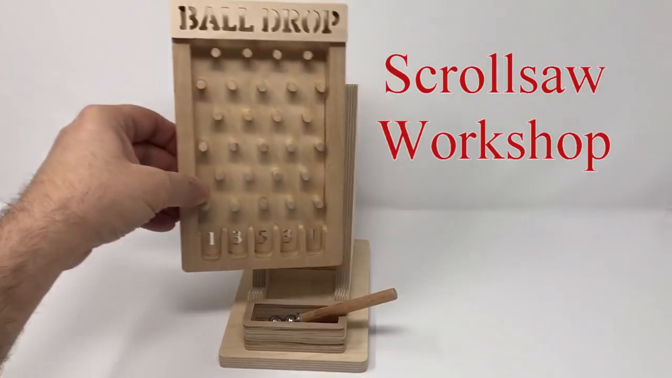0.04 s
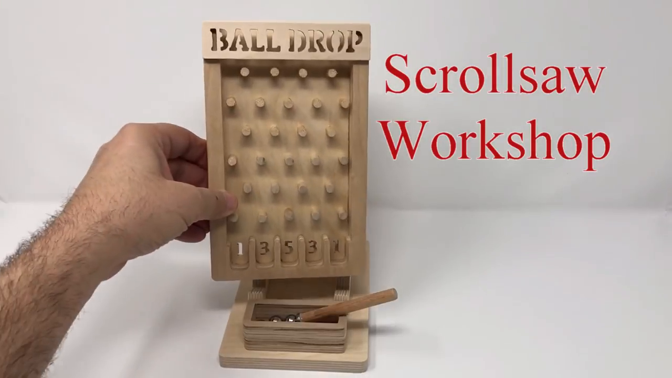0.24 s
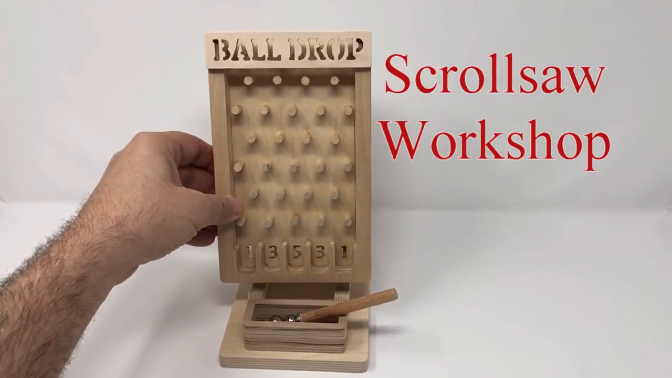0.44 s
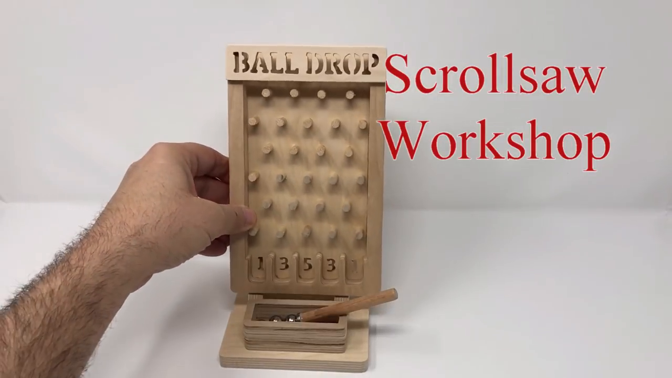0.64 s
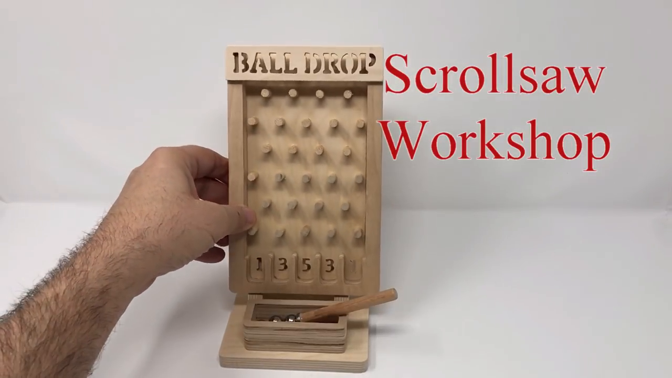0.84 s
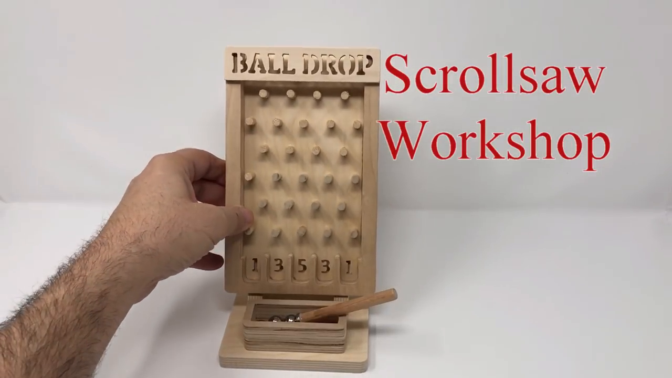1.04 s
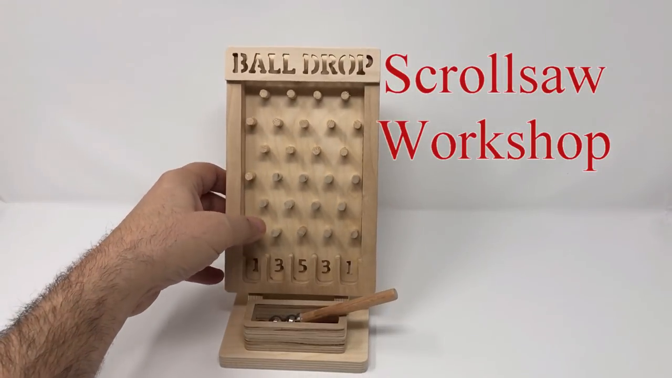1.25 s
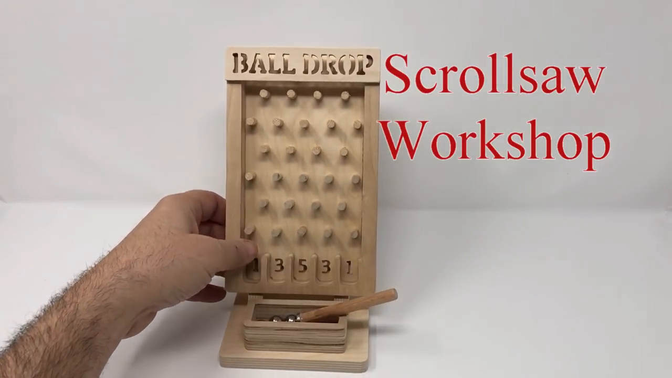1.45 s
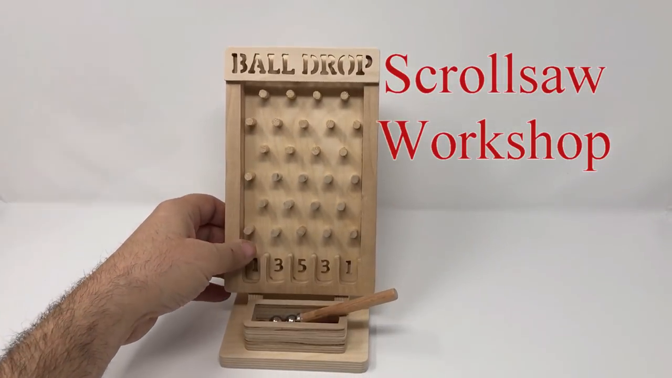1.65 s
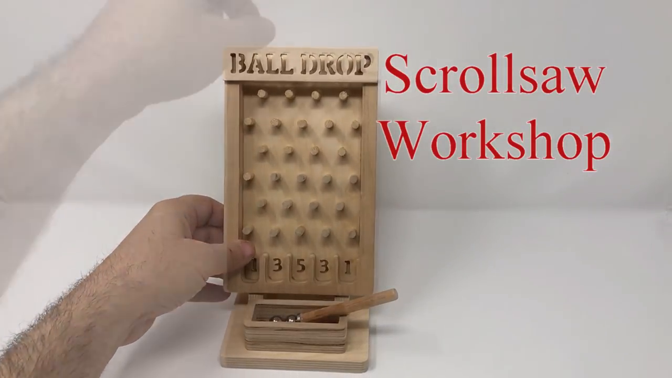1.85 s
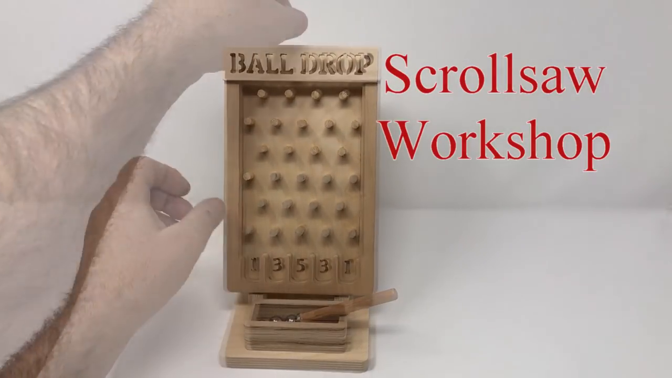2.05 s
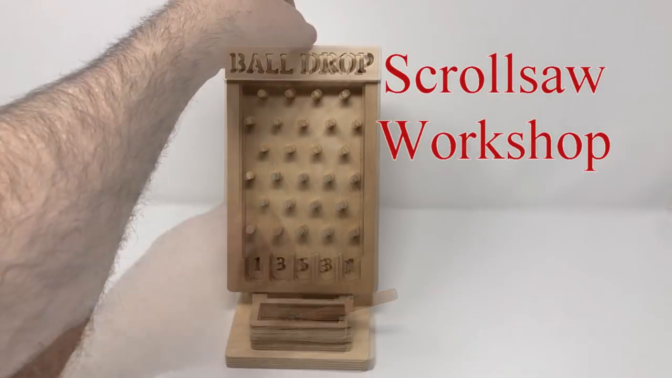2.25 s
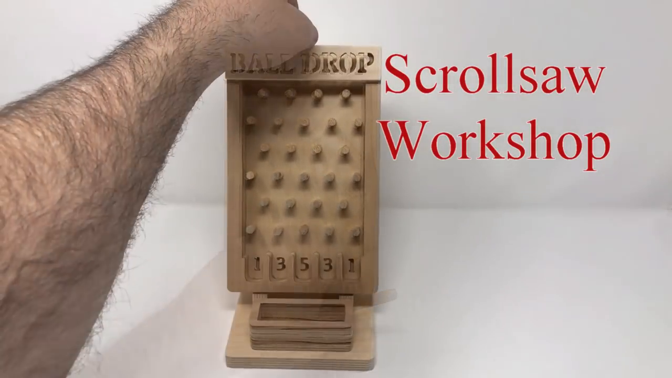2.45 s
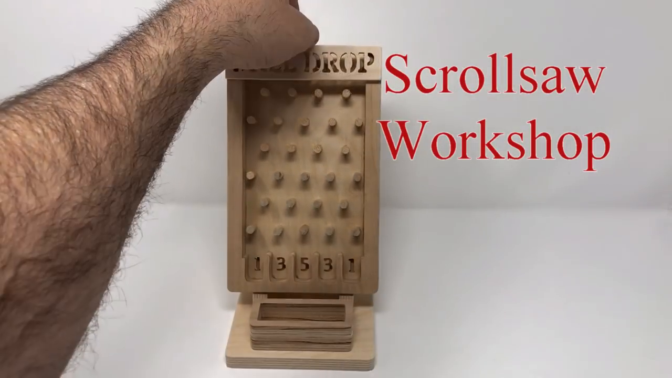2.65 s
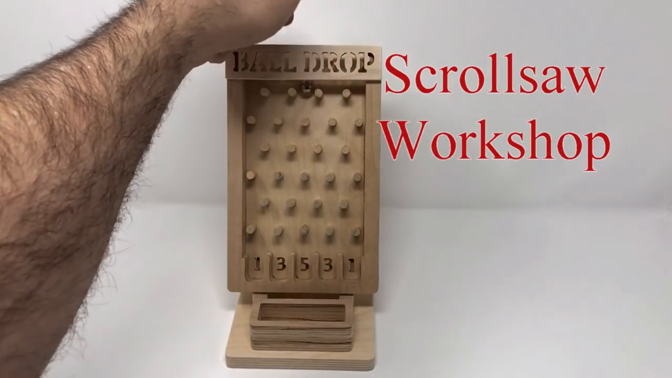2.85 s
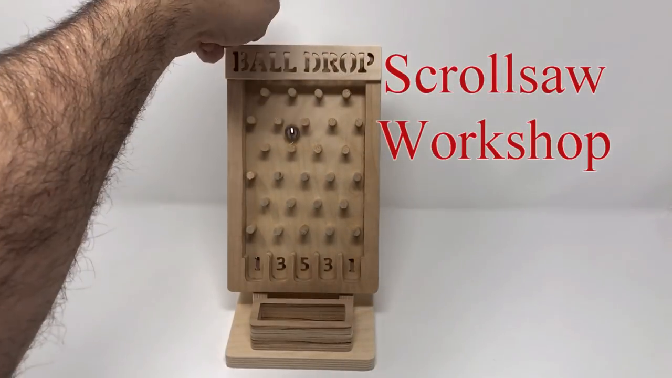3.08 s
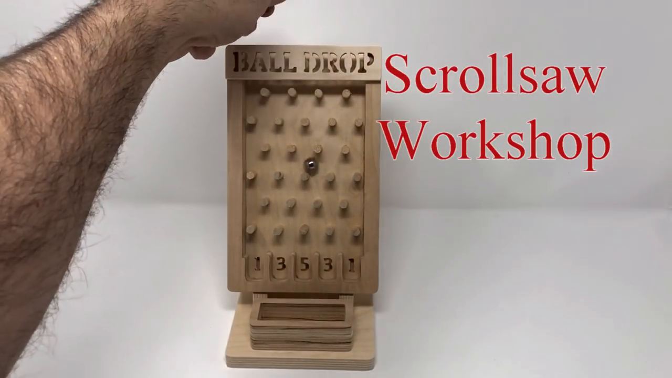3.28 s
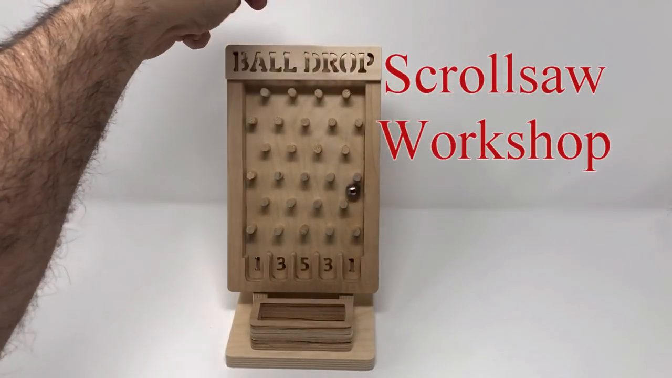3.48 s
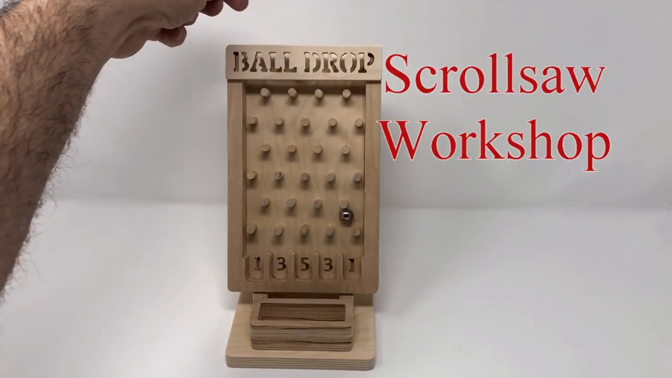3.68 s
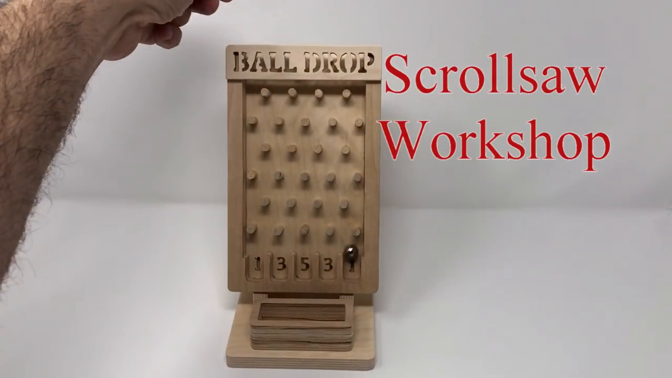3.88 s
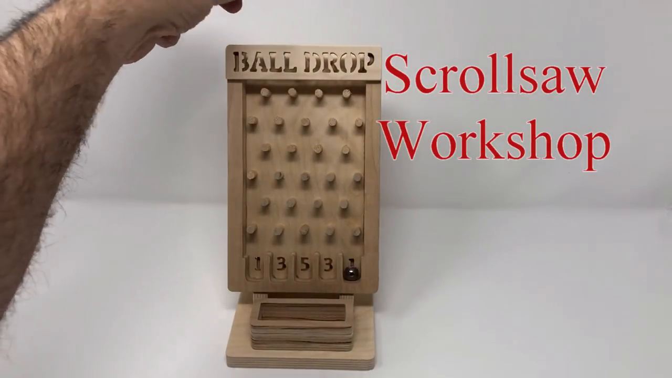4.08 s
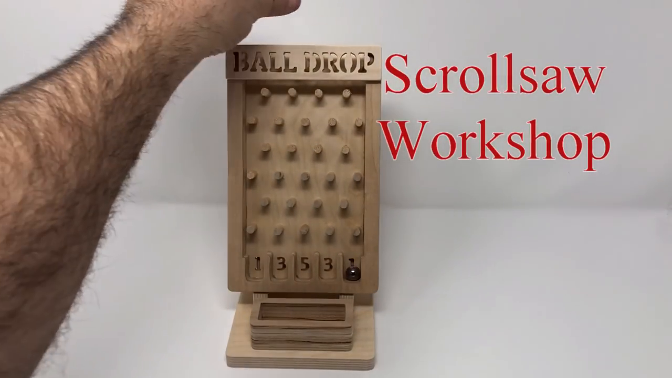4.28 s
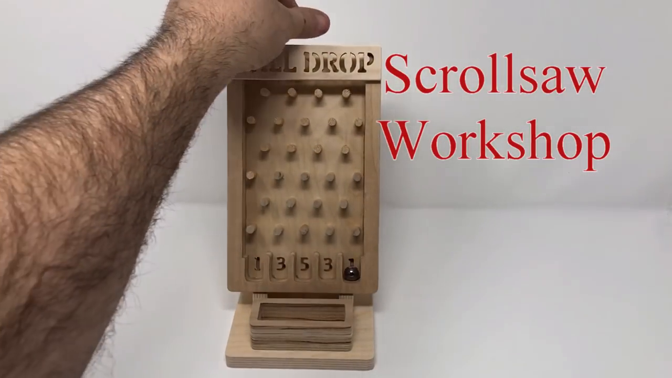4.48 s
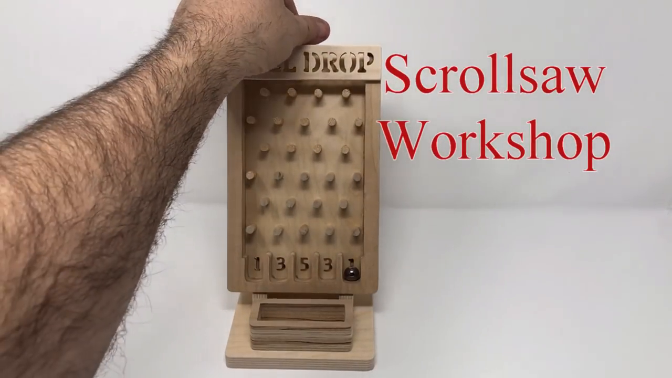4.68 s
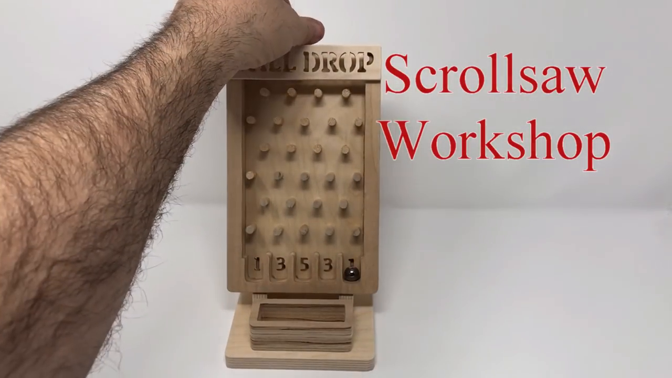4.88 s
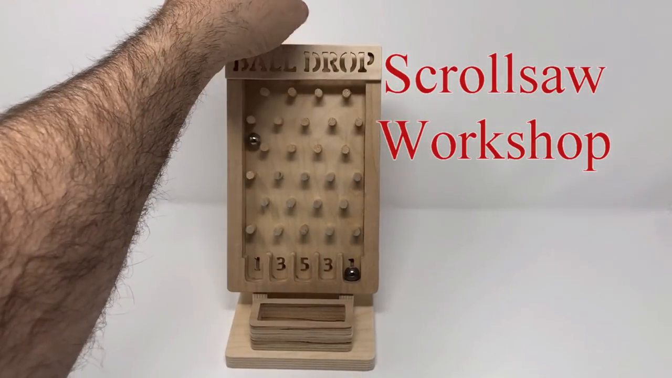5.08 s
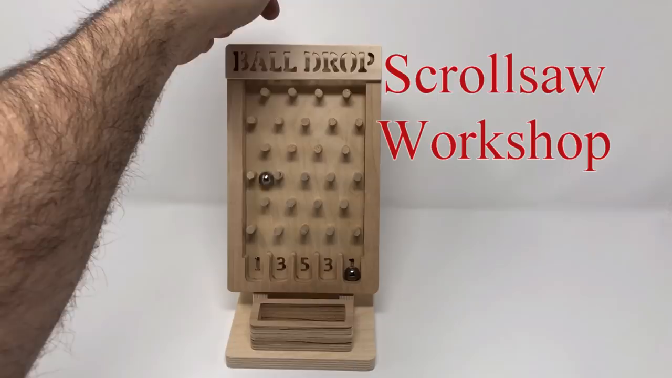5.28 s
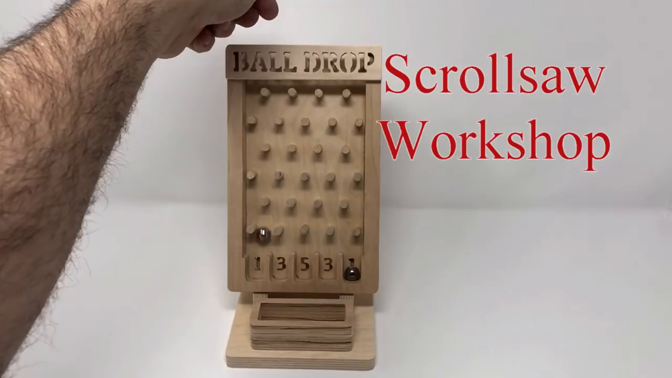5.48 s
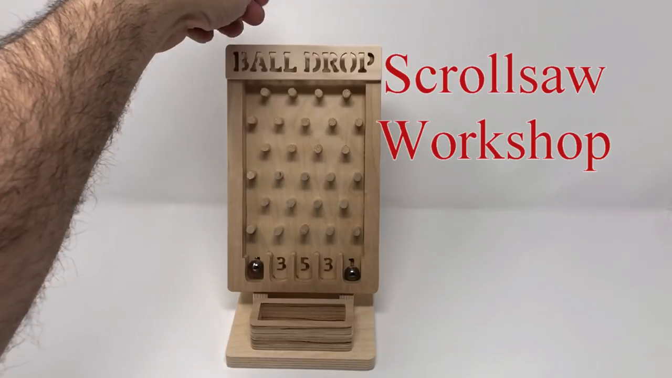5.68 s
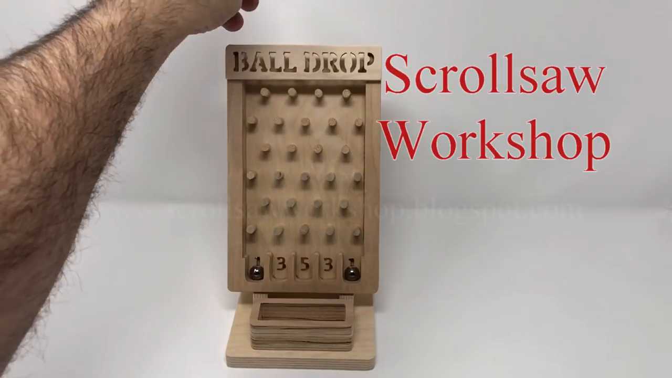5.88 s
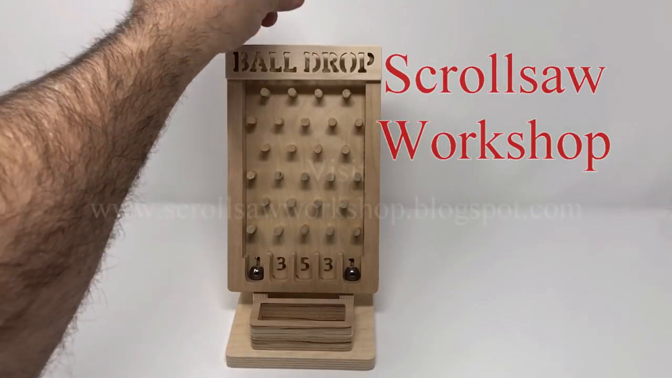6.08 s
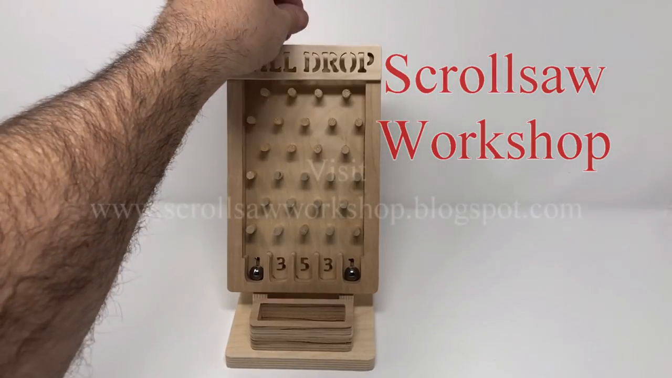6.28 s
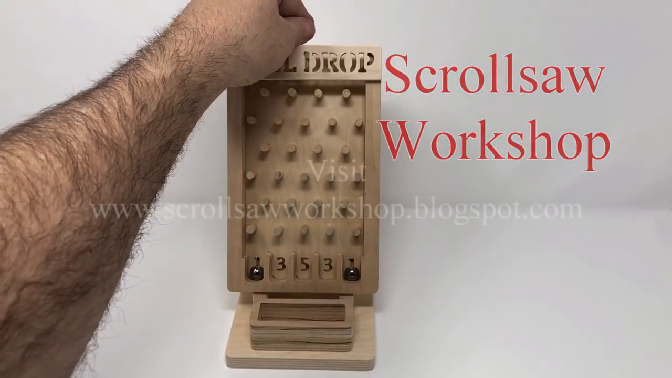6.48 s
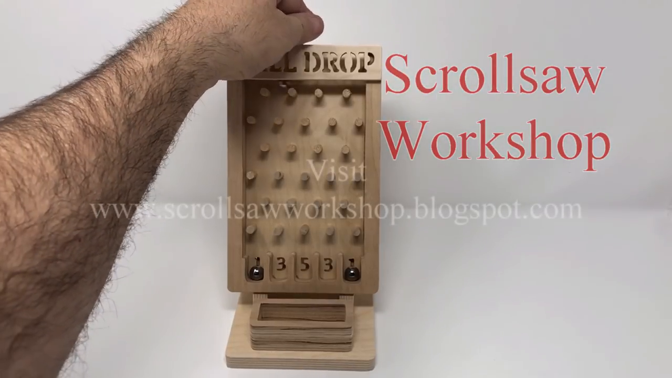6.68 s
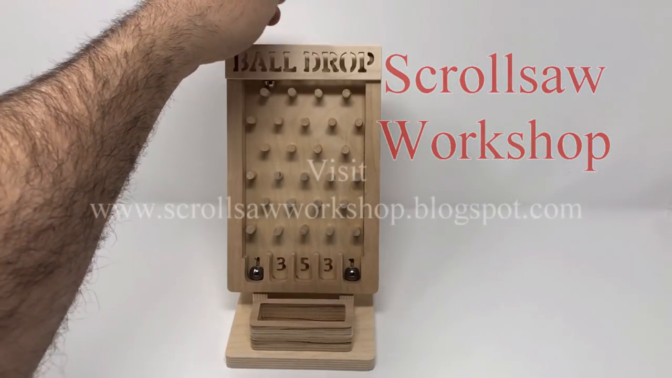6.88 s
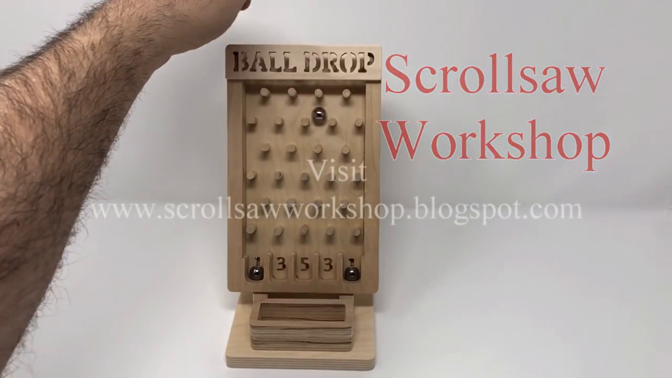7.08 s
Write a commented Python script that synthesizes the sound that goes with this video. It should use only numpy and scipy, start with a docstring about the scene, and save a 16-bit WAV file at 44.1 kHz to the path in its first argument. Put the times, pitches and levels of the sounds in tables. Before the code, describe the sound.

For the first two seconds, a small wooden board is slid onto its stand, with light knocks near 0.2, 0.7 and 1.7 seconds, softer taps between them, dry rubbing and a few faint squeaks. At about 2.7 seconds a small steel ball starts clattering down the board's wooden pegs in quick, uneven clicks and clacks, with a light rolling hum between hits. It lands in a slot at about 4 seconds with a few fast, fading bounces. After a short pause, a second ball clatters down from about 4.9 seconds and bounces to rest with a brighter rattle near 5.8 seconds. A third ball starts at 6.7 seconds and is still clicking through the pegs at the end, just after 7 seconds. The microphone is close, in a quiet workshop with little echo, a low rumble, a faint drone and soft hiss.

```python
"""Steel balls drop one by one through a small wooden peg board: they clatter from peg to peg, roll down
the slope and bounce to rest in a slot. Each contact rings the board's modes and nudges its stand and the
table. Before that, the board is slid onto the stand with a few knocks, stick-slip rubbing and faint
squeaks. A quiet workshop rumbles, drones and hisses around a close microphone."""
import sys
import numpy as np
from scipy import signal
from scipy.fft import rfft, irfft, next_fast_len
from scipy.io import wavfile
from scipy.ndimage import map_coordinates

SR = 44100
rng = np.random.default_rng(int(sys.argv[2]) if len(sys.argv) > 2 else 0)


def store_wav(level_fs):
    """Save 16-bit WAV to argv[1]."""
    pcm = np.round(np.clip(np.atleast_2d(level_fs), -1, 1) * 32767)
    wavfile.write(sys.argv[1], SR, pcm.T.astype(np.int16))


N = 314557
T = np.arange(SR // 4) / SR  # time within one blow, s


def amp(db):
    """dB to gain."""
    return 10 ** (np.asarray(db) / 20)


def unit(x):
    """Scale to rms 1."""
    return x / np.sqrt(np.mean(x ** 2, axis=-1, keepdims=True) + 1e-20)


def along(points, hz):
    """Interpolate (f/Hz, value) points on a log axis."""
    f, v = np.transpose(points)
    return np.interp(np.log(hz + 1), np.log(f + 1), v)


def wobble(knots_per_s):
    """Smooth random curve."""
    knots = rng.standard_normal(int(N * knots_per_s / SR) + 4)
    return map_coordinates(knots, [np.arange(N) * knots_per_s / SR])


def filtered(x, response):
    """Apply a complex frequency response."""
    m = next_fast_len(x.shape[-1] + SR // 2)
    return irfft(rfft(x, m) * response(np.fft.rfftfreq(m, 1 / SR)), m)[..., :x.shape[-1]]


def noise(spectrum):
    """Coloured noise, rms 1."""
    return unit(filtered(rng.standard_normal(N), lambda hz: amp(along(spectrum, hz))))


def resonances(peaks):
    """Response of (f/Hz, width/Hz, level/dB) peaks, alternating in sign."""
    return lambda f: sum((-1) ** k * amp(db) * 1j * f * width / (hz * hz - f * f + 1j * f * width)
                         for k, (hz, width, db) in enumerate(peaks))


def gate(start, end, edge_s):
    """Soft-edged on/off envelope."""
    t = np.arange(N) / SR
    return np.sin(np.pi / 2 * np.clip(np.minimum(t - start, end - t) / edge_s + .5, 0, 1)) ** 2


# rumble swell: t/s, level/dB
RUMBLE_LEVEL = [(0, -56), (.85, -50.5), (1.6, -55), (2.001, -66), (2.6, -54), (3, -48), (4.749, -62),
                (4.9, -40.5), (5.05, -53), (6.3, -57), (6.411, -43.5), (6.501, -53.5), (7.13, -53.5)]
# room noise spectra: f/Hz, relative density/dB
RUMBLE_SPECTRUM = [(19, -42.5), (32, -11.5), (80, -3), (129, -17), (146, -25.5), (170, -21), (220, -55),
                   (370, -120)]
DRONE_SPECTRUM = [(88, -40.5), (150, -8), (254, -4.5), (286, -8.5), (349, -1.5), (531, -21.5), (562, -27),
                  (700, -23), (910, -43.5), (1540, -120)]
HISS_SPECTRUM = [(350, -39.5), (600, -14.5), (944, -11.5), (1430, -16), (4050, -17.5), (14300, -27.5),
                 (16000, -32.5)]


def workshop():
    """Wavering rumble and drone under a near-steady hiss."""
    swell_db = np.interp(np.arange(N) / SR, *np.transpose(RUMBLE_LEVEL))
    rumble = amp(swell_db + 1.3 * wobble(7.5)) * noise(RUMBLE_SPECTRUM)
    drone = amp(-61 + 2.5 * wobble(17) + 1.5 * wobble(2.9)) * noise(DRONE_SPECTRUM)
    hiss = amp(-71.5 + 0.65 * wobble(4.1)) * noise(HISS_SPECTRUM)
    return rumble + drone + hiss


def ring(modes, spread_db, rise_s, rise_cycles):
    """One blow, a row per mode at random strength; low bending waves are slow and swell later."""
    hz, db, t60 = np.transpose(modes)[:, :, None]
    strength, phase = rng.standard_normal((2, len(modes), 1))
    swell = (1 - np.exp(-T / (rise_s + rise_cycles / hz))) ** 2
    decay = amp(db + spread_db * strength - 60 * T / t60)
    return decay * swell * np.sin(2 * np.pi * hz * T + 0.5 * phase)


# clear board modes: f/Hz, level within register/dB, t60/s
BOARD_MODES = [(724.5, 3.5, 0.13), (918.3, 0, 0.08), (968, 1, 0.048), (1076, -5.5, 0.071),
               (1174.6, -2, 0.044), (1278, -3, 0.039), (1432, -13.5, 0.063), (1687, 1, 0.03),
               (1725, 0, 0.033), (1835, -9.5, 0.089), (2150, -18, 0.025), (2278, 0.5, 0.033),
               (2833, 6, 0.042), (3050, -5, 0.078), (2977, 5.5, 0.054), (3155, -14.5, 0.092),
               (3370, -0.5, 0.074), (3920, 1, 0.024), (4190, 4.5, 0.017), (4510, -5.5, 0.029),
               (4620, -5, 0.03), (5600, -6.5, 0.02)]
# registers (boom, knock, clack, click, tick, air): low/Hz, high/Hz, dense share/1, dense t60/s
REGISTERS = [(724.1, 820, 0.09, 0.1), (837, 1550, 0.2, 0.035), (1533, 2450, 0.7, 0.04),
             (2380, 4470, 0.9, 0.033), (5380, 8580, 0.96, 0.036), (9250, 11000, 0.9, 0.054)]


def board_strike(register_db, dense, t60_scale, bright_hz):
    """Struck board: clear modes plus dense ringing per register; the struck spot favours one band."""
    mode_hz, mode_db, mode_t60 = np.transpose(BOARD_MODES)
    damped = np.column_stack([mode_hz, mode_db, mode_t60 * t60_scale])
    spot_db = 1.8 + 1.3 * np.log2(mode_hz[:, None] / mode_hz[0])  # high modes vary more with the spot
    modes = ring(damped, spread_db=spot_db, rise_s=0.00041, rise_cycles=1.0)
    start = rng.integers(N - len(T))
    bands = []
    for db, (low, high, share, t60), haze in zip(register_db, REGISTERS, dense):
        inside = (mode_hz >= low) & (mode_hz < high)
        clear = modes[inside].sum(0) / (np.linalg.norm(amp(mode_db[inside])) or 1)
        blur = haze[start:start + len(T)] * amp(-60 * T / (t60 * t60_scale)) * (1 - np.exp(-T / 0.0013))
        bands.append(amp(db) * (np.sqrt(2 * (1 - share)) * clear + np.sqrt(share) * blur))
    bright = resonances([(bright_hz, 0.27 * bright_hz, -0.8)])
    return sum(bands[:2]) + filtered(sum(bands[2:]), lambda f: 0.81 + bright(f))


def dense_ringing():
    """Unresolved modes: one noise band per register, crowded round the clear modes."""
    def crowding(f):
        peaks = sum(amp(2 * min(db, 0)) / (1 + (2 * (f - hz) / (0.1 * hz)) ** 2) ** 2
                    for hz, db, _ in BOARD_MODES)
        treble = f > REGISTERS[-2][0]
        return np.sqrt(0.2 ** 2 + treble + peaks)

    bands = [noise([(low * 0.34, -45), (low, 0), (high, -3), (high * 1.49, -30), (high * 2, -70)])
             for low, high, *_ in REGISTERS]
    return unit(filtered(np.array(bands), crowding))


def register_levels(knock_db, boom_db, clack_db, tick_db, bright_hz):
    """Level/dB of each register; click and air follow clack and tick."""
    click_db = 3.5 + 0.68 * clack_db + 0.52 * tick_db
    air_db = -20.5 + 0.3 * clack_db + 0.91 * tick_db + 2 * np.log2(bright_hz / 8000)
    return knock_db + np.array([boom_db, 0, clack_db, click_db, tick_db, air_db])


# stand base and table top: f/Hz, level/dB, t60/s
BASE_MODES = [(325, 13, 0.04), (454, 10.5, 0.051), (513, 5, 0.051)]
TABLE_MODES = [(70.6, -5.5, 0.26), (126.4, -10.5, .22), (216, 5.5, 0.057)]
# the heavy board favours the table's low modes: change per mode/dB
HEAVY_DB = [3, 6.5, -7.5]
# board on stand or fingertip: t/s, knock/dB, clack/dB re knock, tick/dB re knock, base/dB, table/dB
KNOCKS = [(0.198, -10, -24.5, -32, -31, -35), (0.235, -16, -19.5, -28, -59, -36),
          (0.582, -33, -23, -22, -44.5, -43), (0.632, -33.5, -29, -15, -45.5, -38.5),
          (0.688, -16, -5.5, -31, -35.5, -29), (0.949, -33, 0.5, -22, -47, -35.5),
          (1.06, -23, -33, -44, -43, -35), (1.089, -26.5, -22, -38, -47, -39),
          (1.212, -22, -36, -46, -47.5, -39.5), (1.227, -21.5, -18.5, -39, -52, -56),
          (1.717, -13, -9, -24, -47, -33), (2.469, -28.5, -11, -57, -56, -56)]


def knocks():
    """Wood on wood: the hand-damped board rings briefly; base and table thud."""
    boom_db, bright_hz = -9, 1680
    out, dense = np.zeros(N + SR), dense_ringing()
    table_modes = [(hz, db + change_db, t60) for (hz, db, t60), change_db in zip(TABLE_MODES, HEAVY_DB)]
    for s, knock_db, clack_db, tick_db, base_db, table_db in KNOCKS:
        base = ring(BASE_MODES, spread_db=4.5, rise_s=0.00069, rise_cycles=0.68).sum(0)
        table = ring(table_modes, spread_db=3.0, rise_s=0.00057, rise_cycles=0.066).sum(0)
        register_db = register_levels(knock_db, boom_db, clack_db, tick_db, bright_hz)
        board = board_strike(register_db, dense, t60_scale=0.5, bright_hz=bright_hz)
        out[round(s * SR):][:len(T)] += board + amp(base_db) * base + amp(table_db) * table
    return out[:N]


# rubbed edge resonances: f/Hz, width/Hz, level/dB
EDGE_PEAKS = [(1764, 16, 0), (2120, 60, 5), (2690, 39, 4), (3640, 150, 2), (4520, 840, -9.5),
              (6260, 410, -6.5)]
# sliding wood, fingers, rolling ball: start/s, end/s, body/dB, edge hiss/dB
STROKES = [(0.2, 0.567, -58.5, -62.5), (0.565, 0.737, -52, -57), (0.933, 1.039, -49, -55),
           (1.061, 1.171, -65, -58.5), (1.199, 1.282, -61, -63), (1.35, 1.528, -63, -68.5),
           (1.571, 1.622, -56, -63.5), (1.715, 1.786, -44, -55.5), (1.946, 1.978, -71, -71),
           (2.358, 2.673, -64, -73.5), (2.699, 4.202, -47, -78), (4.662, 4.74, -57.5, -75),
           (4.786, 4.952, -59.5, -67), (4.939, 5.955, -51, -72), (6.009, 6.076, -69, -70),
           (6.515, 6.691, -61, -71.5), (6.722, 6.971, -50.5, -72.5)]
# edge squeaks: start/s, end/s, f/Hz, level/dB
SQUEAKS = [(0.634, 0.685, 5580, -58), (0.986, 1.022, 2695, -45), (1.254, 1.28, 5800, -54.5),
           (1.368, 1.514, 2690, -67.5), (1.955, 1.97, 2700, -65)]


def rubbing():
    """Stick-slip grains drive the board's low modes and the resonances of the rubbed edge."""
    grains = rng.standard_normal(N) * amp(0.82 * wobble(300) + 4.3 * wobble(30))
    low_peaks = [(hz, 6 / t60, db) for hz, db, t60 in BOARD_MODES if hz < 1800]
    body = unit(filtered(grains, resonances(low_peaks)))
    scrape = lambda hz: 0.27 * hz * hz / (hz * hz + 1800 ** 2) / (1 + (hz / 9000) ** 2)
    edge = unit(filtered(grains, lambda hz: resonances(EDGE_PEAKS)(hz) + scrape(hz)))
    out = sum(gate(start, end, edge_s=0.045) * (amp(body_db) * body + amp(edge_db) * edge)
              for start, end, body_db, edge_db in STROKES)
    for start, end, hz, db in SQUEAKS:
        squeak = unit(filtered(grains, resonances([(hz, 0.019 * hz, 0)])))
        out += amp(db) * gate(start, end, edge_s=0.018) * squeak
    return out


def radiated(x, cutoff_hz=670):
    """The open panel radiates little bass."""
    return signal.sosfilt(signal.butter(6, cutoff_hz, "high", fs=SR, output="sos"), x)


# ball on peg, panel or rail: t/s, knock/dB, then boom, clack, tick/dB re knock, favoured f/Hz
BALL_HITS = [(2.67, -16, -15, -8.5, -16, 8500), (2.693, -16.5, 6.5, 4, -12.5, 1700),
             (2.72, -15.5, -17, -10, -24, 6470), (2.743, -45.5, 4.5, -15, -30.5, 13400),
             (2.783, -8, -17, -11.5, -13.5, 1710), (2.864, -9.5, -14, -14, -25, 1710),
             (2.921, -21.5, -6.5, -35.5, -29, 7400), (2.955, -19.5, -20, -9.5, -10.5, 1700),
             (2.974, -24, 2, -26.5, -36, 7400), (3.012, -8.5, -9, -8, -20, 7600),
             (3.045, -30.5, 11.5, -22, -38.5, 13400), (3.083, -15, -53.5, -13.5, -19.5, 4540),
             (3.159, -23.5, 2, -13.5, -25.5, 4600), (3.188, -12, -11.5, -7, -14.5, 2300),
             (3.267, -18, -5, -3, -19, 2300), (3.324, -19, -13.5, -26, -21, 7350),
             (3.338, -25.5, 3.5, -9.5, -24.5, 7400), (3.376, -15.5, -7, -2, -6, 1700),
             (3.424, -22, -6, 0, -5.5, 3050), (3.444, -20, -2.5, -26, -28.5, 3300),
             (3.49, -20.5, -16.5, -11, -19.5, 7400), (3.517, -10, -6, -8.5, -18, 8400),
             (3.532, -22, -8, 3, -30.5, 8700), (3.568, -18, -15, -1, -3.5, 8700),
             (3.591, -13.5, 0, 0, -35, 2300), (3.624, -16.5, -9.5, -9, -16.5, 8300),
             (3.675, -21.5, -22, -6, -12, 7000), (3.705, -21, 1.5, -14.5, -47, 7200),
             (3.717, -17.5, -5.5, -13.5, -29, 7400), (3.755, -22, 2, 6.5, -6.5, 8400),
             (3.818, -14.5, -30, 1.5, -16.5, 4680), (3.922, -13, -16, 2.5, -4.5, 1700),
             (3.957, -18, -2, -2.5, -22, 2300), (3.987, -38.5, -0.5, 8.5, -1, 4400),
             (4.002, -28, -4.5, -5, -20, 13400), (4.015, -27, -22.5, -3, -18.5, 4860),
             (4.943, -10, -3, 0, -25, 4340), (4.968, -14, -11.5, -11, -21.5, 7450),
             (4.989, -19.5, 7.5, -6.5, -47.5, 13400), (5.027, -13, -2, -15, -20, 7200),
             (5.092, -8, -13, -10, -23.5, 8800), (5.149, -14, -1.5, -3.5, -27.5, 1700),
             (5.159, -10.5, -34.5, -9.5, -19.5, 8800), (5.174, -16.5, -1, -8.5, -33.5, 3300),
             (5.19, -19.5, -3, -11, -26.5, 8300), (5.214, -36.5, 16, -1.5, -41, 3400),
             (5.268, -15, -13, -1.5, -11.5, 8600), (5.295, -32, -17, -4, -14, 8500),
             (5.329, -13.5, -22, -3.5, -17, 4600), (5.348, -18, 2.5, -18, -24.5, 7200),
             (5.369, -23, 1, -15.5, -15, 7400), (5.406, -18, -18, -7, -0.5, 1700),
             (5.467, -22, -4, 3.5, -43.5, 2300), (5.509, -10, -20.5, -4.5, -8.5, 1700),
             (5.537, -17.5, -4.5, -5.5, -28.5, 6000), (5.562, -17.5, -17.5, 2.5, -9, 4200),
             (5.577, -22, -3.5, -23.5, -16.5, 7600), (5.602, -16.5, -9.5, 7.5, -2.5, 4200),
             (5.633, -16, -10, -5, -30.5, 2300), (5.661, -23, -23.5, 6, -5, 11100),
             (5.678, -19.5, -31.5, 1.5, -14, 2300), (5.693, -31, -26, 6.5, -1, 11400),
             (5.711, -27, -22.5, -0.5, -38.5, 11400), (5.739, -41.5, -8.5, 8, -16, 13400),
             (5.806, -19, -8.5, -17, -38, 12000), (6.699, -21, 1, -10.5, -63, 3300),
             (6.73, -5.5, -1, -2.5, -22, 1700), (6.744, -26.5, -0.5, 8.5, -7, 8250),
             (6.773, -12, -7, -14.5, -11.5, 1700), (6.8, -13.5, -4, -9, -20.5, 7800),
             (6.819, -22, -4, -4.5, -22, 2200), (6.873, -18, -32, -8.5, -24, 7200),
             (6.911, -29, -19, -7, -40, 7200), (7.036, -41, 10.5, -6, -31, 11700),
             (7.073, -11, -6, -4, -11, 8500)]


def ball_clatter():
    """Each contact rings the board and nudges the stand and table beneath it."""
    board, thud, dense = np.zeros(N + SR), np.zeros(N + SR), dense_ringing()
    hits = [(s, register_levels(*levels, hz), 1, hz) for s, *levels, hz in BALL_HITS]
    support_gain = amp([-24] * len(BASE_MODES) + [-16] * len(TABLE_MODES))[:, None]
    for s, register_db, t60_scale, bright_hz in hits + slot_bounces():
        nudge = ring(BASE_MODES + TABLE_MODES, spread_db=4.0, rise_s=0.000096, rise_cycles=0.3)
        nudge_db = (register_db[1] + register_db[4]) / 2  # mean of knock and tick
        board[round(s * SR):][:len(T)] += board_strike(register_db, dense, t60_scale, bright_hz)
        thud[round(s * SR):][:len(T)] += amp(nudge_db) * (support_gain * nudge).sum(0)
    return radiated(board[:N]) + thud[:N]


# ball on the slope: start/s, end/s, hum/dB, rattle/dB
ROLLS = [(2.705, 3.353, -40, -59.5), (3.354, 3.865, -37, -53.5), (3.941, 4.03, -48, -43),
         (4.944, 5.53, -37, -59.5), (5.527, 5.746, -37, -45), (6.724, 6.936, -43, -67.5)]


def rolling():
    """The ball's rough path keeps the lowest mode humming and the upper modes rattling."""
    bumps = rng.standard_normal(N) * amp(2.7 * wobble(120) + 1.2 * wobble(14))
    hum_hz, _, hum_t60 = BOARD_MODES[0]
    hum = unit(filtered(bumps, resonances([(hum_hz, 2.6 / hum_t60, 0)])))
    upper_peaks = [(hz, 8 / t60, db) for hz, db, t60 in BOARD_MODES if 1800 < hz < 4700]
    rattle = unit(filtered(bumps, resonances(upper_peaks)))
    return sum(gate(start, end, edge_s=0.05) * (amp(hum_db) * hum + amp(rattle_db) * rattle)
               for start, end, hum_db, rattle_db in ROLLS)


# slot landings: t/s, level/dB, first flight/s, flight ratio/1, loss per bounce/dB, treble/dB,
# favoured f/Hz, f ratio/1
LANDINGS = [(4.044, -3.5, .061, .58, 11, -8, 3863, .78), (5.752, -4.5, .072, .64, 6, 6.5, 4020, .97)]
# contacts per landing: count
LANDING_CONTACTS = [5, 8]
# slot timbre per register: offset/dB
SLOT_COLOUR_DB = [-16, -11, -5, -0.3, -14.5, -21]
# dulling per register: extra loss per bounce/dB
SLOT_DULLING_DB = [-1.5, -1, -2.36, -1.33, 3.5, 3]


def slot_bounces():
    """Contact list for the slots: each flight shorter, each bounce weaker and duller."""
    t60_scale = 0.8  # damping at the stiff slot rail
    treble = np.arange(len(REGISTERS)) >= 4
    contacts = []
    for landing, count in zip(LANDINGS, LANDING_CONTACTS):
        s, db, flight_s, flight_ratio, loss_db, treble_db, hz, hz_ratio = landing
        first_db = db + np.array(SLOT_COLOUR_DB) + treble_db * treble
        for k in range(count):
            delay_s = flight_s * (1 - flight_ratio ** k) / (1 - flight_ratio)
            register_db = first_db - k * (loss_db + np.array(SLOT_DULLING_DB))
            contacts.append((s + delay_s, register_db, t60_scale, hz * hz_ratio ** k))
    return contacts


# room decay: f/Hz, t60/s
ROOM_T60 = [(200, 0.41), (1000, 0.18), (4000, 0.12), (12000, 0.08)]


def walls(x):
    """Delayed room reverberation; treble dies first."""
    hz, t, spectra = signal.stft(rng.standard_normal(SR // 2), SR, nperseg=256)
    decay = amp(-60 * t / along(ROOM_T60, hz)[:, None])
    _, tail = signal.istft(spectra * decay, SR, nperseg=256)
    return signal.fftconvolve(np.pad(x, (150, 0)), tail / np.linalg.norm(tail))[:N]


def scene():
    """Board and room, mono."""
    board = ball_clatter() + radiated(rolling() + rubbing()) + knocks()
    return (board + amp(-9.5) * walls(board) + workshop())[None]


def record(dry):
    """Microphone: roll-off at both ends, soft clipping, hard band limit."""
    low_hz, high_hz, limit_hz = 42, 15300, 16300
    ceiling, knee = 0.98, 6
    mic = filtered(dry, lambda hz: hz ** 3 / (hz ** 3 + low_hz ** 3) / (1 + (hz / high_hz) ** 30))
    soft = mic / (1 + np.abs(mic / ceiling) ** knee) ** (1 / knee)
    return filtered(soft, lambda hz: hz < limit_hz)


dry = scene()
out = record(dry)
store_wav(out)
```